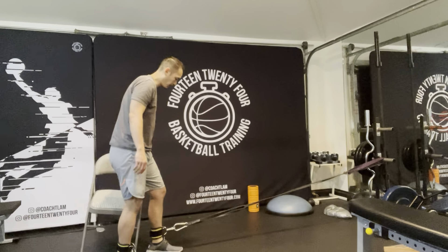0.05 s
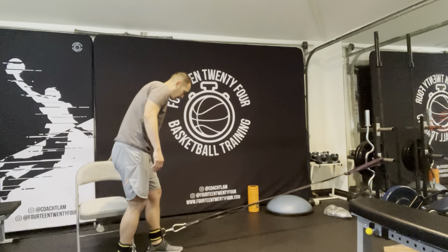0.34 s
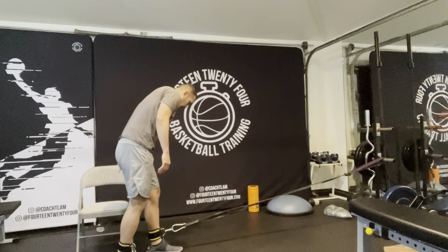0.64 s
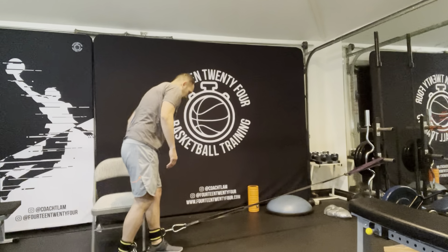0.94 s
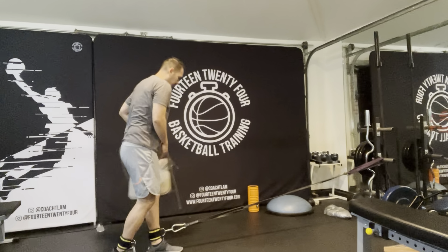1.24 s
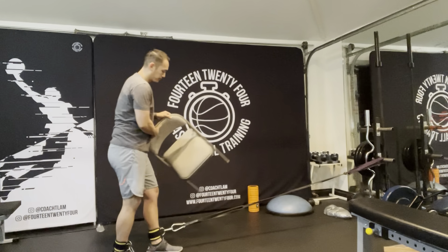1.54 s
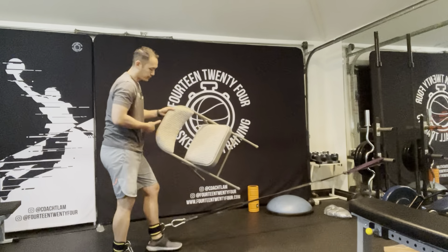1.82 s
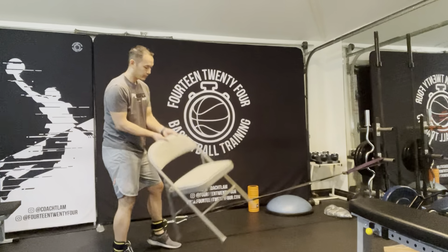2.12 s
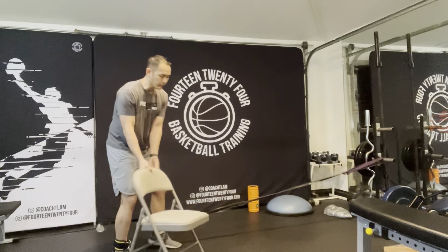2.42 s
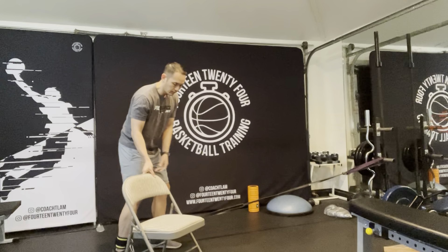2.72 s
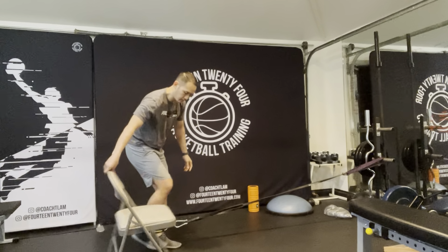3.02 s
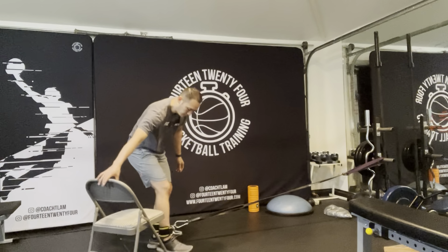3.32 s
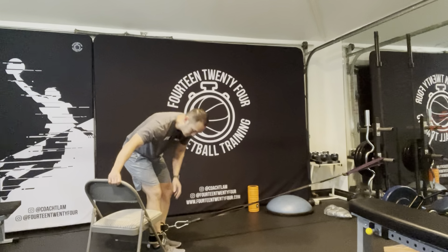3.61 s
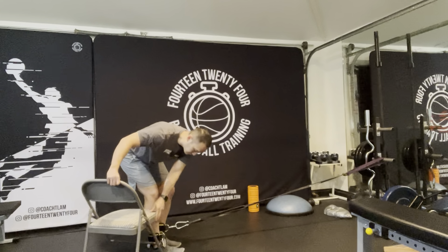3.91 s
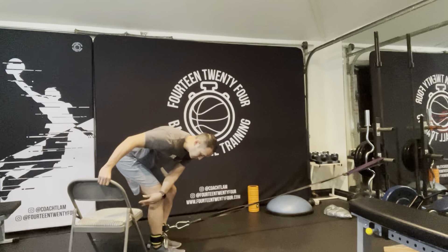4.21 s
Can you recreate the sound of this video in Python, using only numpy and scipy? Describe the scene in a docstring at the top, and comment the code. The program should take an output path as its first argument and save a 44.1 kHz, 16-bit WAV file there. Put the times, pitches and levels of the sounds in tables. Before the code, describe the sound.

After a few light knocks, a steel folding chair clatters down, drags a short way and settles with a clink.

```python
"""Folding chair in a home gym

One microphone in a reverberant room, far enough off to hear about as much room as direct sound.
Steps shuffle and light knocks shake a metal folding chair. It crashes and bounces on the padded floor,
its steel seat and tube frame ringing, then is dragged a short way, the legs sticking and slipping.
Loose hinge hardware pings, and a last clink and knock follow as it comes to rest."""
import sys
import numpy as np
from scipy import signal
from scipy.fft import rfft, irfft, next_fast_len
from scipy.io import wavfile

SR = 44100
rng = np.random.default_rng(int(sys.argv[2]) if len(sys.argv) > 2 else 0)


def wav_record(signal):
    """Record a signal, one row per channel, as 16-bit PCM in the file named by sys.argv[1]."""
    frames = np.transpose(np.atleast_2d(signal))
    bounded = np.clip(frames, -1, 1)
    # unit amplitude maps onto the largest positive 16-bit level
    quanta = np.round(bounded * 32767).astype(np.int16)
    wavfile.write(sys.argv[1], SR, quanta)


N = 196377

# The chair lands and bounces. Each row: start in seconds; level, bass and treble in dB; the seat's clang
# in Hz and its level in dB; seconds to the first bounce, its level and treble in dB; floor boom in dB.
CRASHES = [(2.376, -22.5, 4.5, 3.5, 980, -28, .055, -40, -10, -39),
           (2.474, -18.5, -12.5, -0.5, 1490, -22, .046, -23.5, -10.5, -33.5),
           (3.098, -23, 10, -2.5, 1324, -23.5, .031, -22.5, -11, -39)]
CRASH_RATTLE_S, BOOM_S = 0.0019, 0.02
BOUNCE_GAP_SHARE, BOUNCE_LOSS_DB, BOOM_LOSS_DB = .9, 8, 2   # from one bounce to the next
BOUNCE_BASS_DB, BOUNCE_RATTLE_S = 3, 0.018
CLANG_S, CLANG_WIDTH_SHARE = 0.0089, 0.25
# Single contacts of a leg or the seat. Each row: start in seconds; level, bass and treble in dB;
# rattle decay in seconds.
TAPS = [(0.003, -49, -2, 13.5, 0.064), (0.195, -51.5, -22, 2, 0.037), (1.930, -58.5, 0, 16, 0.017),
        (2.365, -30, 4, -11, 0.009), (2.664, -44, -30, 20.5, 0.014), (2.731, -46, 2, 20.5, .004),
        (3.084, -24.5, 10.5, 11.5, 0.02), (3.294, -29.5, 15.5, -10, 0.009),
        (3.336, -37.5, 16.5, 11, 0.0062), (3.395, -31, 8.5, 0.5, 0.0097), (3.442, -37, -23, 12, 0.037),
        (4.027, -49.5, 17, 24, 0.011)]
# The crowded resonances of the sheet-steel seat. Each row: frequency in Hz, gain in dB.
SEAT_SPECTRUM = [(45, -28), (150, -15), (280, -12.5), (480, -12.5), (750, -10.5), (1100, -10.5), (1400, -5),
                 (1800, -4), (2300, -14), (3200, -15.5), (4300, -22.5), (7000, -38), (11000, -35),
                 (16000, -46.5)]
# How long the seat rings. Each row: frequency in Hz, t60 in seconds.
SEAT_T60 = [(60, 0.037), (300, 0.17), (1000, 0.051), (1700, 0.051), (4000, 0.095), (12000, 0.037)]
# The tube frame's modes. Each row: frequency in Hz, relative level in dB, t60 in seconds.
FRAME_MODES = [(176.6, -5, 0.93), (702, -8, 0.29), (1260, -6, 0.078), (1390, -13, 0.17), (1500, 4, 0.47),
               (1570, 9.5, 0.1), (1836, 22, 0.11), (1745, -8, 0.21), (1870, -10, 0.19), (1994, 9, 0.81)]

DRAG_START_S, DRAG_RISE_S, DRAG_RELEASE_S, DRAG_COAST_S = 3.15, .025, 3.413, .06
DRAG_DB, SLIPS_PER_S = -45.5, 250   # at full speed
SLIP_RATE_FOLLOWS = 0.34   # slip rate goes with this power of the speed

# Dull knocks that shake the chair. Each row: start in seconds, level in dB, resonance in Hz, relative
# overtone level in dB, seconds until the chair rattles, that rattle's level, bass and treble in dB.
KNOCKS = [(0.303, -49, 920, -4, 0.019, -45, 10, -2), (1.195, -49.5, 1000, -8.5, .037, -45, -5.5, -0.5),
          (1.550, -55, 403, -14, 0.0035, -51, -10, 10.5), (2.019, -55.5, 870, -4, .03, -52.5, -1, 9.5),
          (3.803, -42.5, 292, 1, 0.00078, -43, -22, 11), (4.213, -47, 637, 3.5, 0.00214, -47.5, 7.5, -5)]
KNOCK_S, KNOCK_WIDTH_SHARE, OVERTONE_RATIO = 0.022, 0.39, 2.16
SHAKE_S = 0.015   # the rattle that follows a knock
# Loose parts of the frame buzzing. Each row: start in seconds, level in dB, resonance in Hz.
BUZZES = [(0.364, -54, 3770), (1.227, -57, 3500), (3.029, -46, 200), (3.087, -40, 5740), (3.457, -40, 4400)]
BUZZ_S, BUZZ_WIDTH_SHARE = 0.045, .16

# Hinge hardware pinging. Each row: start in seconds, jingle level in dB, clear ring level in dB.
PINGS = [(1.175, -61, -82), (1.226, -60, -76), (2.974, -59, -75), (3.008, -49.5, -51), (3.443, -40.5, -56),
         (3.455, -31.5, -27), (3.67, -61, -63)]
# The hinge's jingle. Each row: frequency in Hz, gain in dB.
JINGLE_SPECTRUM = [(3000, -3), (5000, -29), (9500, -13), (10200, 5), (10600, -3), (11200, -13),
                   (12400, -38), (13100, -12), (13700, 7), (14300, -20), (16000, -32.5)]
# The hinge's clear ring. Each row: frequency in Hz, relative level in dB, t60 in seconds.
HINGE_MODES = [(10100, -35, 0.19), (12790, 12, 0.094), (12820, -22, 0.063), (13300, -6.5, .2),
               (13400, -21, 0.197), (13900, -7, 0.16), (14860, -22, .06)]
# A sliding metal clink. Each row: start in seconds, level in dB, rattle decay in seconds.
CLINKS = [(4.095, -50, .006), (4.102, -39, 0.0035)]
# The clink's bright crack. Each row: frequency in Hz, gain in dB.
CRACK_SPECTRUM = [(1500, -29), (3000, -9), (4700, -7), (5450, 4), (6300, -10.5), (8000, -13), (11500, -4),
                  (13500, -11), (16000, -19)]
# The clink's ring. Each row: frequency in Hz, relative level in dB, t60 in seconds.
CLINK_MODES = [(5590, -4, 0.19), (5430, -15, 0.18), (5780, -2, 0.08), (6060, -9.5, 0.12)]

# Weight landing on the rubber floor. Each row: start in seconds, level in dB, decay in seconds.
THUDS = [(0.003, -44, 0.015), (0.307, -40.5, 0.0079), (0.355, -41.5, 0.028), (1.548, -60, 0.011),
         (3.293, -34, 0.042), (3.399, -44, .04), (4.01, -50.5, 0.046), (4.22, -50, 0.031)]
# The floor's boom. Each row: frequency in Hz, gain in dB.
FLOOR_SPECTRUM = [(25, -9.5), (42, -34), (60, 11), (85, -6.5), (130, -3.5), (250, -18), (600, -17),
                  (2000, -46)]
# Soles and clothes scuffing. Each row: peak time in seconds, level in dB, length in seconds.
SCUFFS = [(0.0, -49.5, 0.1), (0.24, -64, 0.49), (0.404, -59, 0.33), (0.734, -66, 0.6), (0.957, -60.5, 0.34),
          (1.596, -55.5, 0.055), (2.06, -60, 0.17), (2.996, -58, 0.37), (3.737, -55, 0.79),
          (4.023, -55, 0.2), (4.228, -60.5, 0.26)]
# The colour of that rubbing. Each row: frequency in Hz, gain in dB.
SCUFF_SPECTRUM = [(59, -24), (100, -6.5), (249, -9), (398, -19.5), (502, -2.5), (608, -9), (1230, -13),
                  (1800, -2), (1950, -12), (3050, -11.5), (5530, -20.5), (6840, -32.5), (16000, -33)]
# Tiny dry ticks. Each row: time in seconds, peak level in dB.
TICKS = [(0.7456, -14), (1.2551, -26.5), (2.4862, -14.5), (2.9961, -25), (3.7160, -15.5), (4.2261, -28.5)]

# The gym's reverberation. Each row: frequency in Hz, t60 in seconds.
GYM_T60 = [(60, 0.38), (250, 0.88), (800, 0.53), (1700, 0.85), (4000, 0.7), (7000, 0.61), (13000, 0.11)]
# Room tone, mostly low rumble. Each row: frequency in Hz, gain in dB.
AIR_SPECTRUM = [(12, -52), (20, 4.5), (38, 3), (60, -5), (101, -6), (158, -11.5), (216, -17.5),
                (234, -20.5), (310, -17.5), (607, -24), (1860, -19), (3440, -24.5), (6720, -38.5),
                (13500, -40), (16000, -61)]
AIR_DB = -64.5
MIC_LOW_HZ, CUTOFF_HZ = 30.2, 16200


def chair(count=6, wet_db=-1.0):
    """Every blow is a short rattle of seat and frame; the blows take turns among places in the gym."""
    places = np.zeros((count, N))
    for k, (s, db, bass_db, treble_db, length) in enumerate(blows()):
        places[k % count] += placed(s, db, through(rattle(length), chair_body(bass_db, treble_db)))
    return sum(gym(place, wet_db) for place in places)


def chair_body(bass_db, treble_db, bass_hz=550, treble_hz=5000, frame_db=-13):
    """The chair struck at a fresh point: heavy contacts add bass, steel on steel adds treble."""
    def colour(hz):
        bass_shelf = bass_db / (1 + (hz / bass_hz) ** 4)
        treble_shelf = treble_db / (1 + (treble_hz / hz) ** 4)
        return at_hz(SEAT_SPECTRUM, hz) + bass_shelf + treble_shelf
    seat = dense_ring(colour, SEAT_T60)
    frame = mode_ring(FRAME_MODES, spread_db=4.5)
    return unit(np.pad(seat, (0, len(frame) - len(seat))) + from_db(frame_db) * frame)


def blows():
    """Every tap, landing, bounce and shake of the chair, in rows laid out like TAPS."""
    rows = list(TAPS)
    for s, db, bass_db, treble_db, _, _, gap, bounce_db, bounce_treble_db, _ in CRASHES:
        rows.append((s, db, bass_db, treble_db, CRASH_RATTLE_S))
        rows += [(at, bounce_db - k * BOUNCE_LOSS_DB, BOUNCE_BASS_DB, bounce_treble_db, BOUNCE_RATTLE_S)
                 for k, at in enumerate(bounce_times(s, gap)[1:])]
    for s, *_, delay, db, bass_db, treble_db in KNOCKS:
        rows.append((s + delay, db, bass_db, treble_db, SHAKE_S))
    return rows


def bounce_times(s, gap, count=3):
    """A landing and its bounces, each following sooner than the last."""
    return s + np.append(0, np.cumsum(gap * BOUNCE_GAP_SHARE ** np.arange(count - 1)))


def drag(bass_db=7, bass_hz=650, treble_db=-1, contacts=5):
    """Each floor contact sticks and slips on its own, jerking the chair more with speed."""
    t = np.arange(N) / SR
    pull = np.clip((t - DRAG_START_S) / DRAG_RISE_S, 0, 1)
    coast = np.exp(-np.maximum(t - DRAG_RELEASE_S, 0) / DRAG_COAST_S)
    speed = pull * coast   # share of full speed
    per_s = np.maximum(SLIPS_PER_S * speed ** SLIP_RATE_FOLLOWS, 1)
    out = 0
    for _ in range(contacts):
        slipping = rng.random(N) < per_s / contacts / SR
        slips = slipping * rng.uniform(0.21, 2.19, N) * rng.choice([-1, 1], N)
        jerks = slips * np.sqrt(SR / per_s) * speed * from_db(DRAG_DB)
        chatter = through(jerks, chair_body(bass_db, treble_db, bass_hz))
        out += gym(chatter, wet_db=1.0)
    return out


def knocks():
    """A knock wakes a broad resonance and its overtone; a landing clangs the seat; loose parts buzz."""
    thumps = sum(placed(s, level_db, resonance(centre, KNOCK_WIDTH_SHARE, KNOCK_S))
                 for s, db, hz, overtone_db, *_ in KNOCKS
                 for centre, level_db in [(hz, db), (hz * OVERTONE_RATIO, db + overtone_db)])
    clangs = sum(placed(s, db, resonance(hz, CLANG_WIDTH_SHARE, CLANG_S))
                 for s, _, _, _, hz, db, *_ in CRASHES)
    buzzes = sum(placed(s, db, resonance(hz, BUZZ_WIDTH_SHARE, BUZZ_S)) for s, db, hz in BUZZES)
    return thumps + clangs + buzzes


def hardware(jingle_t60=0.042, crack_t60=0.11, clink_ring_db=-7):
    """Small steel parts: a bright jingle or crack, and a few high modes ringing on."""
    out = 0
    for s, jingle_db, ring_db in PINGS:
        jingle = dense_ring(lambda hz: at_hz(JINGLE_SPECTRUM, hz), [(8000, jingle_t60)])
        out += placed(s, jingle_db, jingle)
        out += placed(s, ring_db, mode_ring(HINGE_MODES))
    for s, db, length in CLINKS:
        crack = dense_ring(lambda hz: at_hz(CRACK_SPECTRUM, hz), [(8000, crack_t60)])
        out += placed(s, db, through(rattle(length), crack))
        out += placed(s, db + clink_ring_db, mode_ring(CLINK_MODES))
    return out


def thuds(floor_t60=0.055):
    """The padded floor answers each footfall, landing and bounce with a short boom."""
    booms = [(at, boom_db - k * BOOM_LOSS_DB, BOOM_S)
             for s, *_, gap, _, _, boom_db in CRASHES for k, at in enumerate(bounce_times(s, gap))]
    out = 0
    for s, db, length in list(THUDS) + booms:
        impact = rattle(length)
        floor = dense_ring(lambda hz: at_hz(FLOOR_SPECTRUM, hz), [(100, floor_t60)])
        out += placed(s, db, through(impact, floor))
    return out


def shuffle(grain_db=2.5):
    """Grainy rubbing of soles and cloth, swelling and fading with each scuff."""
    t = np.arange(N) / SR
    swells = sum(from_db(db) * np.cos(np.pi * np.clip((t - s) / length, -.5, .5)) ** 2
                 for s, db, length in SCUFFS)
    grain = unit(cut(rng.standard_normal(N), 43, "low")) * np.sqrt(N)
    return noise(SCUFF_SPECTRUM) * swells * from_db(grain_db * grain)


def ticks():
    """One-sided spikes, a single sample long, with no room on them."""
    out = np.zeros(N)
    for s, db in TICKS:
        out[round(s * SR)] = -from_db(db)
    return out


def gym(x, wet_db, gap_s=0.0069, build_s=0.0051, top_db=-4):
    """Direct sound reaches the microphone first; a diffuse tail builds up as the walls answer."""
    tail = dense_ring(lambda hz: at_hz([(5000, 0.0058), (13000, top_db)], hz), GYM_T60, size=SR)
    swell = 1 - np.exp(-np.maximum(np.arange(SR) / SR - gap_s, 0) / build_s)
    return x + from_db(wet_db) * through(x, unit(tail * swell))


def room_tone():
    """The quiet, steady air of the gym."""
    return from_db(AIR_DB) * noise(AIR_SPECTRUM)


def rattle(length, per_s=1500, first=2.6):
    """One contact followed by a dying flurry of smaller ones."""
    t = np.arange(SR // 4) / SR
    touching = rng.random(len(t)) < per_s / SR
    clicks = touching * rng.standard_normal(len(t)) * np.exp(-t / max(length, 1e-4))
    clicks[0] = first
    return unit(clicks)


def resonance(hz, width_share, length):
    """A short rattle heard through one broad resonance."""
    half_width = width_share * hz / 2
    band = [max(hz - half_width, 30), hz + half_width]
    return cut(rattle(length, per_s=2300, first=5.0), band, "band")


def dense_ring(gain_db, t60s, size=SR // 4):
    """Countless overlapping modes: each octave of a noise dies at its own rate; the sum is coloured."""
    t = np.arange(size) / SR
    white = rfft(rng.standard_normal(size))
    octave = np.log2(np.clip(np.arange(len(white)) * SR / size, 64, 16384))
    out = 0
    for k in np.unique(np.round(octave)):
        share = np.maximum(1 - np.abs(octave - k), 0)   # neighbouring octaves blend
        decay = np.exp(-np.log(1000) * t / at_hz(t60s, 2 ** k))
        out += irfft(white * share, size) * unit(decay)
    return unit(coloured(out, gain_db))


def mode_ring(modes, spread_db=0, size=SR // 2):
    """A few clear modes; spread_db varies their strengths, as the point struck would."""
    t = np.arange(size) / SR
    out = 0
    for hz, db, t60 in modes:
        strength = rng.choice([-1, 1]) * from_db(db + spread_db * rng.normal())
        out += strength * np.sin(2 * np.pi * hz * t) * np.exp(-np.log(1000) * t / t60)
    return unit(out)


def noise(spectrum):
    """Steady noise of a given colour, rms one."""
    hz = np.maximum(np.arange(N // 2 + 1) * SR / N, 1)
    white = rfft(rng.standard_normal(N))
    return unit(irfft(white * from_db(at_hz(spectrum, hz)), N)) * np.sqrt(N)


def coloured(x, gain_db):
    """Causal (minimum-phase) filter; gain_db gives the gain at any frequency."""
    size = next_fast_len(2 * len(x))
    size += size % 2
    hz = np.maximum(np.arange(size // 2 + 1) * SR / size, 1)
    cepstrum = irfft(np.log(from_db(gain_db(hz))))
    cepstrum[1:size // 2] *= 2
    cepstrum[size // 2 + 1:] = 0
    return irfft(rfft(x, size) * np.exp(rfft(cepstrum)))[:len(x)]


def placed(s, level_db, sound):
    """Set a sound at its time; its level is that of its energy spread over a hundredth of a second."""
    sound = unit(sound) * from_db(level_db) * np.sqrt(SR / 100)
    return np.pad(sound, (max(round(s * SR), 0), N))[:N]


def through(x, response):
    """Play a signal through an impulse response."""
    return signal.fftconvolve(x, response)[:N]


def cut(x, hz, kind, order=2):
    """Butterworth filter."""
    return signal.sosfilt(signal.butter(order, hz, kind, fs=SR, output="sos"), x + 1e-18)


def at_hz(points, hz):
    """Read a table on a log-frequency axis."""
    frequencies, values = np.transpose(points)
    return np.interp(np.log(hz), np.log(frequencies), values)


def unit(x):
    """Scale to an energy of one."""
    return x / np.sqrt(np.sum(x ** 2) + 1e-20)


def from_db(db):
    """Decibels to gain."""
    return 10 ** (np.asarray(db) / 20)


def scene():
    """Each source stirs the gym from its own place, over the room tone and dry ticks."""
    seat = chair() + drag() + gym(knocks(), wet_db=-3.5)
    ground = gym(thuds(), wet_db=-3.5) + gym(shuffle(), wet_db=-3.0)
    steel = gym(hardware(), wet_db=-1.5)
    return (seat + ground + steel + room_tone() + ticks())[None]


def record(dry):
    """The microphone loses the deepest bass, and the top is cut steeply."""
    heard = cut(dry, MIC_LOW_HZ, "high")
    return signal.sosfilt(signal.ellip(10, .1, 80, CUTOFF_HZ, fs=SR, output="sos"), heard)


dry = scene()
out = record(dry)
wav_record(out)
```